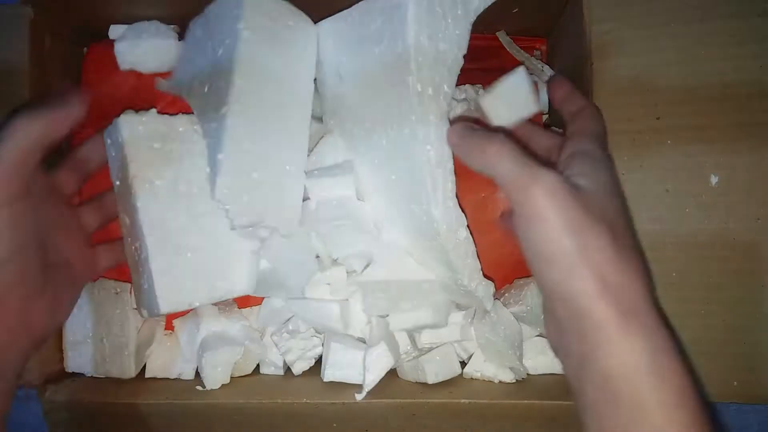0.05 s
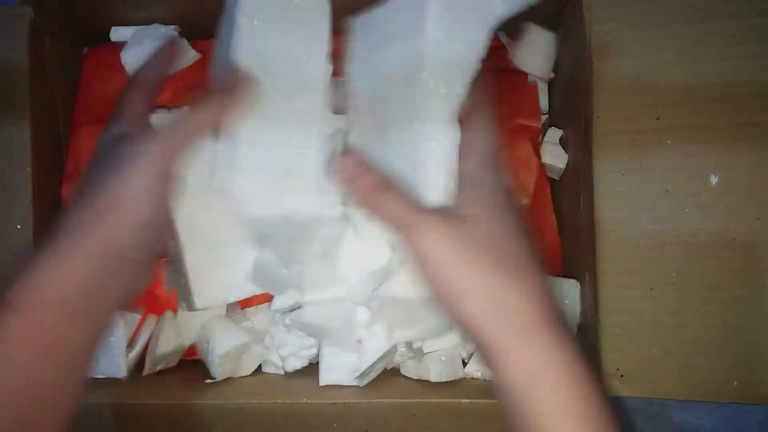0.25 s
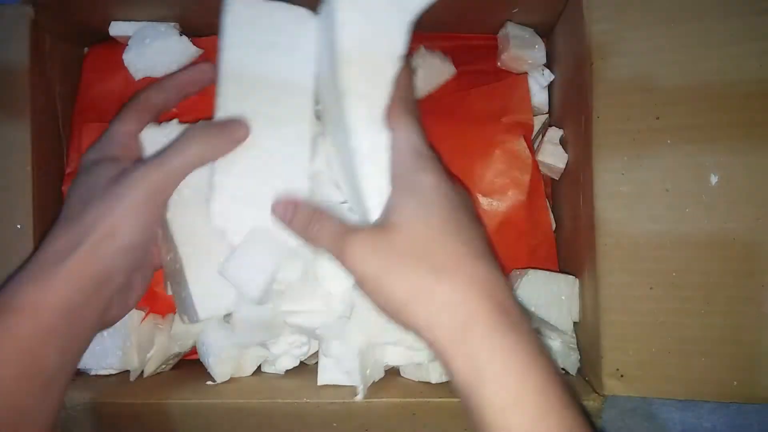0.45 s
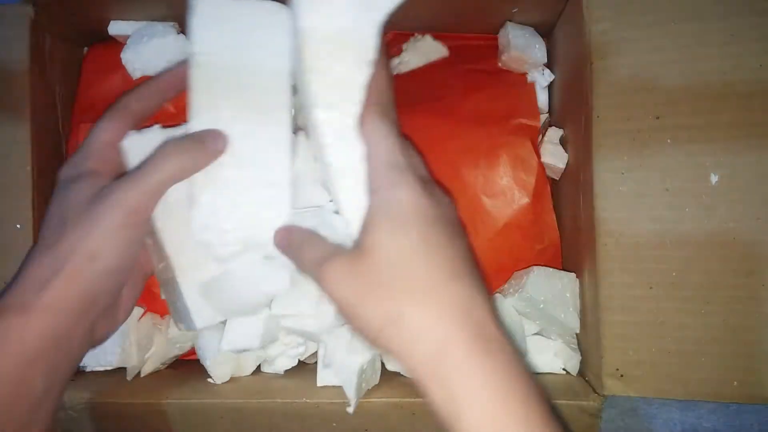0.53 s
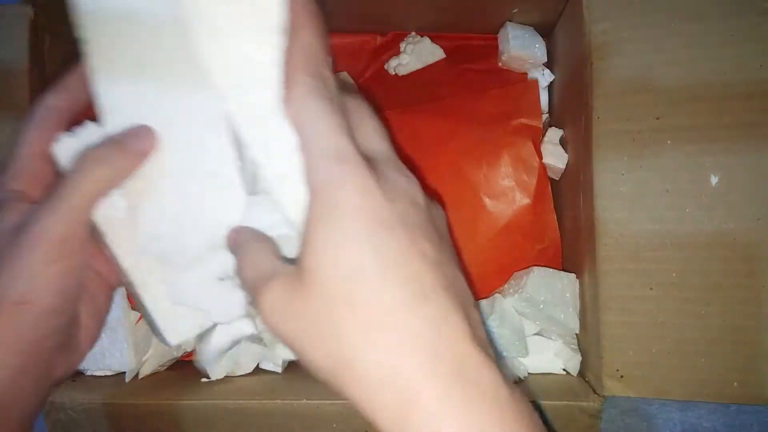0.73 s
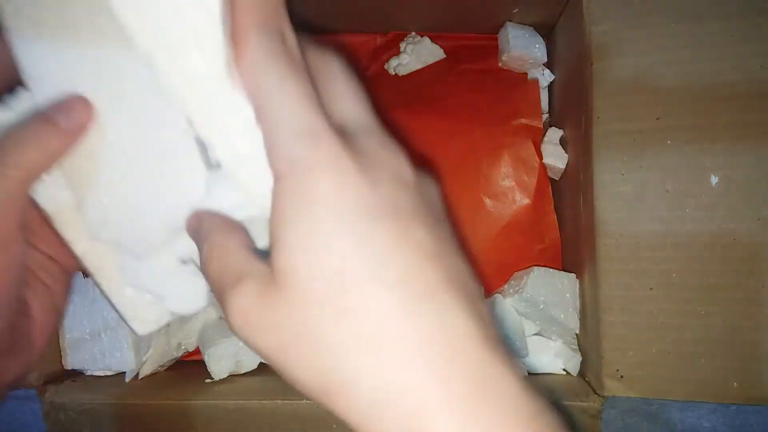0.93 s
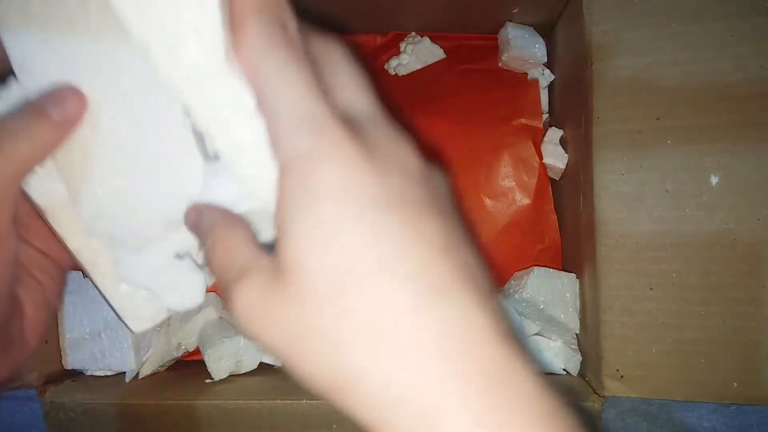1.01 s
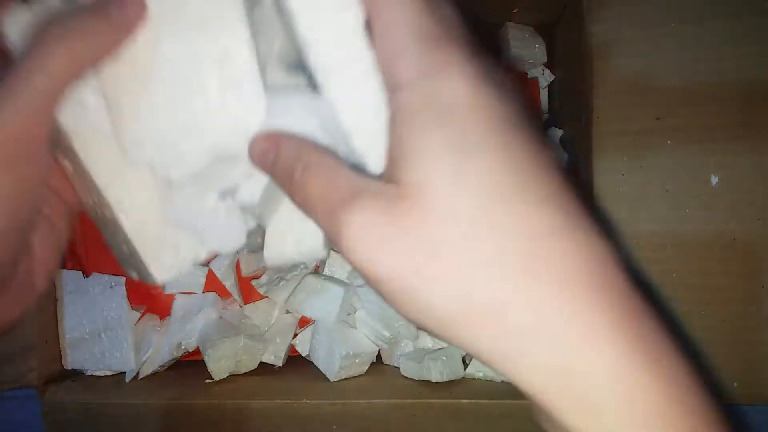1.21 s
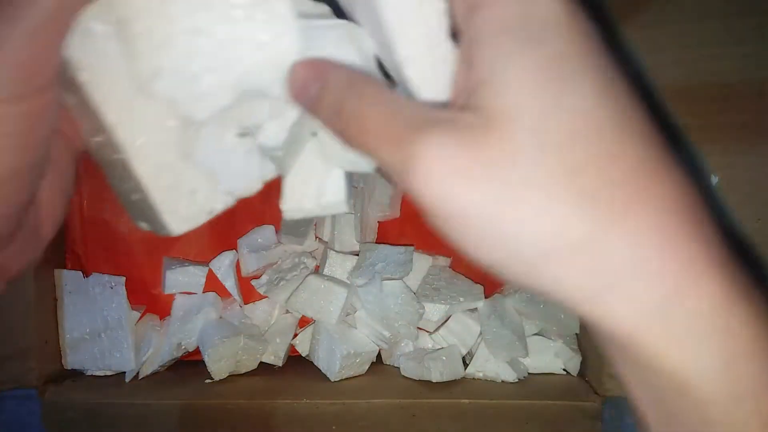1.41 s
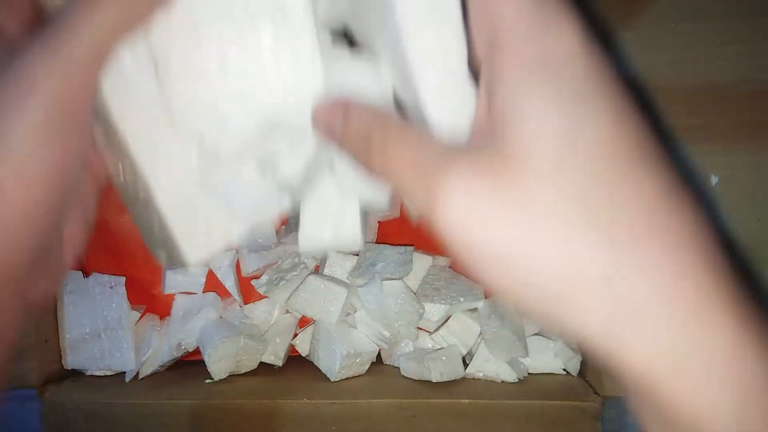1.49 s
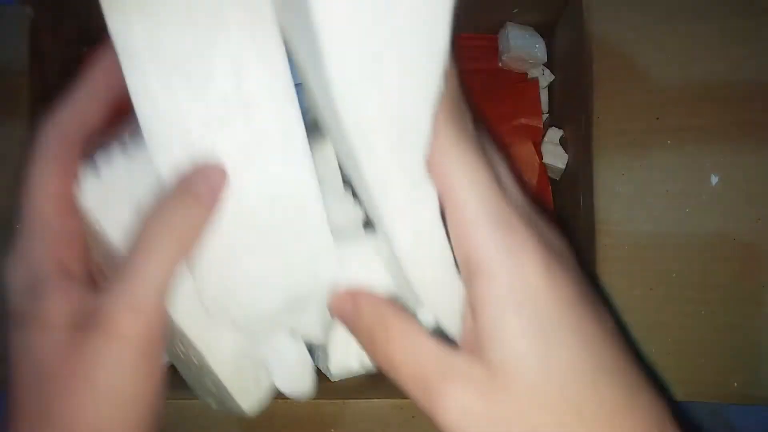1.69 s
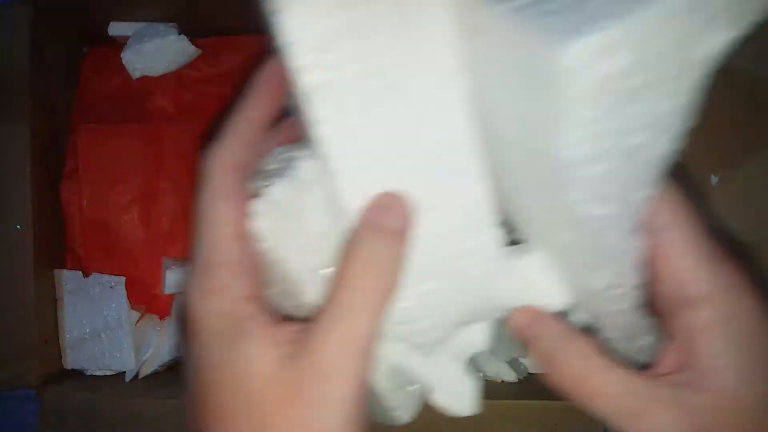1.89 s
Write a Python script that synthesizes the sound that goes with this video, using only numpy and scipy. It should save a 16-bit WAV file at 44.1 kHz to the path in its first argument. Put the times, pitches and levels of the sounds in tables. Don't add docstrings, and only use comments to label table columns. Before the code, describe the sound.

Foam packing blocks rustle lightly under the hands, with a soft low thump in the cardboard box at 0.2 s. A dense, bright crackling crunch builds from 0.42 to 0.69 s over a mid-pitched cardboard drag, then drops away. Sparse ticks and faint rubs follow, a corner crushes at 1.14 s, a face stutters near 1.4 s, chunks knock, and a rub and bump land at 1.8 s. Close, dry, quiet small room.

```python
import sys
import numpy as np
from scipy import signal
from scipy.fft import rfft, irfft, next_fast_len
from scipy.io import wavfile
from scipy.ndimage import uniform_filter1d, map_coordinates

SR = 44100
rng = np.random.default_rng(int(sys.argv[2]) if len(sys.argv) > 2 else 0)


def dump_mix(stems):
    frames = np.atleast_2d(stems).T
    limited = np.clip(frames, -1, 1)
    pcm = np.round(limited * 32767).astype(np.int16)
    wavfile.write(sys.argv[1], SR, pcm)


def field_ratio(decibels):
    return 10 ** (np.asarray(decibels, dtype=float) / 20)


N = 85995


def unit(x):
    return x / np.sqrt(np.mean(x ** 2) + 1e-20)


def along(points, hz):
    f, value = np.transpose(points)
    return np.interp(np.log(hz + 1), np.log(f + 1), value)


def curves(rows):
    s, *columns = np.transpose(rows)
    return [np.interp(np.arange(N) / SR, s, column) for column in columns]


def wobble(rate):
    return map_coordinates(rng.standard_normal(400), [np.arange(N) * min(rate, 200) / SR])


def filtered(x, response):
    m = next_fast_len(N + SR // 2)
    return irfft(rfft(x, m) * response(np.fft.rfftfreq(m, 1 / SR)), m)[..., :N]


def sides(pan_db):
    return field_ratio(np.array([pan_db / 2, -pan_db / 2]))


def add(x, s, sound):
    part = x[..., round(s * SR):][..., :sound.shape[-1]]
    part += sound[..., :part.shape[-1]]


def ring(modes, attack_s):
    t = np.arange(SR // 4) / SR
    tones = sum(field_ratio(db - 60 * t / t60) * np.sin(2 * np.pi * hz * t) for hz, db, t60 in modes)
    return tones * (1 - np.exp(-t / attack_s))


def burst(hz, wide, t60, attack_s):
    t = np.arange(SR // 20) / SR
    a, b = rng.standard_normal((2, len(t)))

    def response(f):
        peak = 1 / (1 + ((f - hz) / (wide * hz)) ** 2)
        hiss = field_ratio(along(FACE_COLOUR, f)) * f ** 4 / (f ** 4 + 4000.0 ** 4)
        return peak + .2 * hiss

    puff = filtered(np.array([a + .5 * b, a - .5 * b]), response)[:, :len(t)]
    return unit(puff) * field_ratio(-60 * t / t60) * (1 - np.exp(-t / attack_s))


def shifting(x, depth_db):
    z = signal.stft(x, nperseg=512)[2]
    common, *own = np.split(rng.standard_normal((3,) + z.shape[1:]), [1])
    field = common + 0.78 * own[0]
    field = uniform_filter1d(uniform_filter1d(field, size=3, axis=1), size=9, axis=2)
    return unit(signal.istft(z * field_ratio(depth_db * unit(field)), nperseg=512)[1][:, :N])


def slips(spectrum, centre_hz, octaves, cycles, size_db, spread_s, bed, count):
    u, g = rng.random((count, 3)), rng.standard_normal((count, 3))
    hz = np.clip(centre_hz * 2 ** (octaves * g[:, :1]), 300, 15500)
    t = np.arange(96) / SR
    size = np.minimum(-size_db * np.log(u[:, 1:2]), 15)
    shape = field_ratio(size - 8.7 * t * hz / cycles) * np.sin(2 * np.pi * hz * t)
    out = np.zeros((2, N))
    for c, sign in enumerate((1, -1)):
        start = np.abs(u[:, :1] * N + sign * spread_s * SR * g[:, 1:2]).astype(int)
        at = start + np.arange(len(t))
        panned = shape * field_ratio(2 * sign * g[:, 2:])
        out[c] = np.bincount(at.ravel(), panned.ravel(), N + SR)[:N]
    out = unit(out) + bed * (rng.standard_normal(N) + .8 * rng.standard_normal((2, N)))
    power = uniform_filter1d(np.sum(np.abs(rfft(out)) ** 2, 0), size=1500)
    even = lambda f: np.interp(f, np.fft.rfftfreq(N, 1 / SR), power) ** -.5
    return shifting(filtered(out, lambda f: even(f) * field_ratio(along(spectrum, f))), depth_db=3.3)


# (frequency [Hz], density [dB per Hz])
AIR_COLOUR = [(25, -48.5), (60, 1), (200, -18.5), (280, -10.5), (600, -21), (1600, -31), (4100, -29.5),
              (9000, -23), (15800, -40.5)]
# (frequency [Hz], level [dB])
HUM = [(62, -91), (272, -83)]


def hush():
    a, b = rng.standard_normal((2, N))
    side = filtered(b, lambda f: field_ratio(along([(60, -20.5), (400, -5.5), (2000, 1.5)], f)))
    air = unit(filtered(np.array([a + side, a - side]), lambda f: field_ratio(along(AIR_COLOUR, f))))
    t = np.arange(N) / SR
    hum = sum(field_ratio(db + 1.5 * wobble(8)) * np.sin(2 * np.pi * hz * t + .4 * wobble(6)) for hz, db in HUM)
    return field_ratio(-73) * air + hum


# (frequency [Hz], t60 [s])
ROOM_T60 = [(300, .3), (3000, .25), (12000, .15)]


def room(x):
    hz, t, z = signal.stft(rng.standard_normal((2, SR // 2)), SR, nperseg=256)
    tail = signal.istft(z * field_ratio(-60 * t / along(ROOM_T60, hz)[:, None]), SR, nperseg=256)[1]
    late = np.pad(x.mean(0), (200, 0))[None]
    return signal.fftconvolve(late, tail / np.linalg.norm(tail[0]), axes=1)[:, :N]


# (frequency [Hz], level [dB], t60 [s])
THUMP = [(74.7, -1.7, 0.043), (210, 2.1, 0.062), (352, 1, 0.037)]
# (frequency [Hz], level [dB], t60 [s])
BUMP = [(430, 0, .03), (790, -3, .025), (1290, -1, .022), (1800, -9, .018)]
# (time [s], level [dB], frequency [Hz])
JOLTS = [
    (.655, -63, 52),
    (1.822, -66, 62),
    (.545, -57, 440),
]


def box_blows():
    out = np.zeros((2, N))
    add(out, .199, field_ratio(-33) * ring(THUMP, .006))
    add(out, 1.8125, field_ratio(-40) * ring(BUMP, .002))
    for s, db, hz in JOLTS:
        add(out, s, ring([(hz, db, .09)], 0.0033))
    return out


# (frequency [Hz], density [dB per Hz])
BOX_COLOUR = [(150, -49), (300, -13.5), (660, -12), (1080, -17), (1250, -1), (1900, -6), (2600, -7),
              (3400, -29), (5700, -120)]
# (time [s], level [dB])
DRAG = [
    (0.0, -59),
    (0.18, -58),
    (0.202, -45.5),
    (0.344, -51.5),
    (0.364, -49),
    (0.596, -52.5),
    (0.692, -59.5),
    (0.754, -73),
    (0.8, -104),
]


def drag():
    db, = curves(DRAG + [(.95, -100)])
    raw = slips(BOX_COLOUR, 1395, 0.64, cycles=2.5, size_db=0, spread_s=.00004, bed=.3, count=2500)
    return raw * field_ratio(db + wobble(40))


# (frequency [Hz], density [dB per Hz])
FACE_COLOUR = [(290, -17), (500, -8.5), (1080, -13), (1300, -6), (2600, -11.5), (3520, -8), (8990, -1.5),
               (15800, -22)]
# (peak time [s], level [dB], rise [s], fall t60 [s], dull part [dB])
RUBS = [(.15, -45, .012, 0.28, -6), (.198, -39, .005, 0.11, -1), (0.799, -54.5, 0.097, 1, -6.5),
        (.865, -54.5, 0.021, 0.87, -31), (1.012, -52.5, 0.0087, 0.16, -9.5), (1.105, -56, 0.023, 0.1, -28),
        (1.15, -49.5, 0.011, .25, -3.5), (1.199, -55.5, 0.0076, .06, -0.5), (1.27, -65, .02, 0.21, -5.5),
        (1.382, -51, 0.028, 0.21, -12), (1.451, -75.5, 0.066, 0.22, 19), (1.509, -67, 0.037, 0.065, 7),
        (1.603, -64.5, .004, 0.62, -1.5), (1.633, -54.5, 0.011, 0.25, -3.5),
        (1.772, -43.5, 0.0038, 0.19, -5.5), (1.817, -33.5, 0.044, 0.049, -0.5),
        (1.839, -49.5, 0.04, 0.2, 1), (1.903, -51.5, 0.0057, 0.16, -8), (1.929, -59, .01, 0.054, -3)]


def rubs():
    t = np.arange(N) / SR
    power = []
    for s, db, rise, fall, _ in RUBS:
        swell_db = np.where(t < s, -25 * (s - t) / rise, -60 * (t - s) / fall)
        power.append(field_ratio(db + swell_db) ** 2)
    power = np.array(power)
    raw = slips(FACE_COLOUR, 6500, .55, cycles=3, size_db=3, spread_s=.00003, bed=.7, count=12000)
    raw = raw * field_ratio(.8 * wobble(90))
    dull = filtered(raw, lambda f: 1 / (1 + (f / 4700) ** 6))
    dull_power = field_ratio(np.array(RUBS)[:, -1]) ** 2 @ power
    return (raw - dull) * np.sqrt(power.sum(0)) + dull * np.sqrt(dull_power)


# (time [s], peak level [dB], frequency [Hz])
KNOCKS = [
    (1.013, -61.5, 1375),
    (1.131, -49, 714),
    (1.167, -56, 690),
    (1.22, -52, 3130),
    (1.462, -45, 1114),
    (1.497, -56.5, 1170),
    (1.514, -62, 1055),
    (1.632, -54, 1025),
    (1.757, -54, 1400),
    (1.772, -46, 1220),
]


def knocks():
    out = np.zeros((2, N))
    for s, db, hz in KNOCKS:
        puff = burst(hz, wide=.3, t60=.016, attack_s=.001)
        mode = ring([(hz, 7, .02)], .001)[:SR // 20]
        add(out, s, field_ratio(db - 6) * (puff + mode))
    return out


# (time [s], peak level [dB], frequency [Hz], left-right [dB])
TICKS = [(0.8565, -35.5, 6430, 1.5), (1.0842, -43, 7700, -4), (1.131, -51, 6000, -3),
         (1.1672, -41.5, 3180, 13), (1.254, -44.5, 7600, 2), (1.3099, -78.5, 8300, 5),
         (1.435, -60, 3000, 2), (1.4493, -55.5, 2500, -4), (1.4616, -46, 6400, 3), (1.496, -56.5, 7230, -2),
         (1.7374, -43.5, 8600, 0), (1.7569, -46.5, 6170, -10), (1.7724, -42, 7400, -8),
         (1.9305, -40.5, 6600, -12)]


def ticks():
    out = np.zeros((2, N))
    for s, db, hz, pan in TICKS:
        puff = burst(hz, wide=.3, t60=.012, attack_s=.0009)
        add(out, s, field_ratio(db) * puff * sides(pan)[:, None])
    return out


# (time [s], level [dB], frequency [Hz])
CRUSH = [
    (1.138, -38.5, 5330),
    (1.13, -38, 3700),
    (1.1405, -33, 6200),
    (1.144, -35.5, 4450),
]


def corner_crush():
    out = np.zeros((2, N))
    for s, db, hz in CRUSH:
        add(out, s, field_ratio(db) * burst(hz, wide=.25, t60=.023, attack_s=.0013))
    return out


# (time [s], peak level [dB], left-right [dB])
SNAPS = [(0.4423, -22, 0), (0.4441, -23, -2), (0.4596, -15, 6), (0.4688, -14, 3), (0.4755, -16, 9),
         (0.4797, -15, 2.5), (0.4894, -15, 4), (0.4991, -19.5, 2), (0.5052, -14, 2.5), (0.5121, -12, 4),
         (0.519, -13.5, -1), (0.533, -17, 5), (0.5369, -14, 4.5), (0.5405, -14.5, 4.5), (0.5555, -10.5, 5),
         (0.5635, -14.5, 4), (0.5743, -16.5, 10), (0.58, -13, 11), (0.5971, -12.5, 6.5), (0.601, -13.5, 5),
         (0.6162, -22.5, 0), (0.6207, -23, 4), (0.6298, -18, -1.5), (0.6363, -17, 2.5), (0.6453, -17, 7),
         (0.6494, -13.5, 8)]
# (time [s], peak level [dB], left-right [dB])
CRACKLE = [
    (1.3751, -42, 5),
    (1.3813, -41, 0),
    (1.385, -47, 2),
    (1.3907, -44, 3.5),
    (1.3955, -50, 1),
    (1.4076, -49, -1),
    (1.4217, -55, 5),
    (1.431, -58, -4),
    (1.4353, -57, 2),
]
# (time [s], peak level [dB], left-right [dB])
STRAYS = [(.002, -30, 1), (.1966, -25, -1), (.2003, -25, -1), (0.2305, -25, 7), (.2633, -32, 0),
          (0.296, -26.5, 1), (.4013, -22.5, -1), (1.0125, -45, 3), (1.0204, -44, 9), (1.027, -45, 4),
          (1.108, -49, 0), (1.1146, -49, 7), (1.2025, -48, 0), (1.8565, -43, -4), (1.9113, -42, -1)]
SNAP_HZ = (5370, 6600, 7940, 9800)


def snaps():
    out, t = np.zeros((2, N)), np.arange(SR // 100) / SR
    t60, rise_s = .007, .0003
    for s, db, pan in SNAPS + CRACKLE + STRAYS:
        g = rng.standard_normal((3, len(SNAP_HZ), 1))
        hz = np.array(SNAP_HZ)[:, None] * (1 + .08 * g[1])
        tones = field_ratio(2.4 * g[0]) * np.sin(2 * np.pi * hz * t + 2 * g[2])
        shape = field_ratio(db - 5 - 60 * t / t60) * (1 - np.exp(-t / rise_s)) ** 2
        add(out, s - .0005, shape * tones.sum(0) * sides(pan)[:, None])
    return filtered(out, lambda f: f ** 6 / (f ** 6 + 3500.0 ** 6) / (1 + (f / 12000) ** 8))


# (time [s], pressure [dB], left-right [dB])
PRESSURE = [
    (0.0, -39, -2.5),
    (0.032, -52, 6.5),
    (0.062, -43, 0.5),
    (0.084, -57, 2.5),
    (0.112, -51, 5),
    (0.22, -32, -2.5),
    (0.244, -38.5, 2),
    (0.282, -41.5, 4.5),
    (0.4, -35.5, 4),
            (0.423, -35, 4),
    (0.46, -26.5, 3),
    (0.599, -23, 8),
    (0.615, -34.5, 2),
    (0.631, -27.5, 1),
    (.646, -24.5, 9),
    (0.676, -23.5, 5),
    (0.69, -40, 2.5),
    (0.772, -55.5, 2.5),
]
# (frequency [Hz], density [dB per Hz])
FOAM_COLOUR = [(290, -83.5), (500, -44.5), (1240, -25), (2350, -16), (3180, -7.5), (4180, -6.5),
               (6180, -4.5), (8990, -6), (15800, -25)]
# (frequency [Hz], width [Hz], lift [ratio])
BLOCK_MODES = [(3060, 370, 0.8), (4430, 200, -0.62), (6000, 960, 0.3), (7600, 1200, 0.63)]
# (frequency [Hz], left-right [dB])
SKEW = [(300, 3.5), (700, 0.5), (2800, -4), (5500, -5), (9500, 7.5), (14000, 2.5)]
# (frequency [Hz], density [dB per Hz])
SHAKE_COLOUR = [(30, -45.5), (60, -17.5), (140, -9.5), (400, -11.5), (900, -34.5), (2000, -120)]


def scrape():
    db, pan = curves(PRESSURE + [(.9, -100, 0.0013)])
    raw = slips(FOAM_COLOUR, 6800, .45, cycles=2.6, size_db=3, spread_s=.00003, bed=1.1, count=12000)

    def body(f):
        modes = sum(lift / (1 + ((f - hz) / width) ** 2) / 2 for hz, width, lift in BLOCK_MODES)
        return (1 + modes) * sides(along(SKEW, f))

    shake = unit(filtered(rng.standard_normal(N), lambda f: field_ratio(along(SHAKE_COLOUR, f))))
    judder_db = .6 * wobble(110)
    shake_db = -77.5 + 0.28 * (db + 37) + 3 * wobble(30)
    crunch = unit(filtered(raw, body)) * field_ratio(db + judder_db) * sides(pan - 2.5)
    return crunch + field_ratio(shake_db) * shake


# (from [s], to [s], frequency [Hz], width [Hz], lift [dB])
HELD = [(0.067, 0.066, 6950, 620, 2), (.455, 0.486, 5200, 270, 7.5), (.505, .605, 6100, 450, 5),
        (.505, .605, 3300, 360, 3), (0.54, .69, 4250, 300, -6.5), (.635, 0.635, 3100, 350, 3.5),
        (.655, 0.688, 5200, 600, 6), (.25, .31, 720, 110, 9.5), (.34, 0.3, 640, 68, 5),
        (.2, .26, 1750, 200, 4)]


def held(x):
    hz, t, z = signal.stft(x, SR, nperseg=512)
    edge_s = .004
    lift_db = 0
    for start, end, centre, width, db in HELD:
        peak = db * np.exp(-((hz[:, None] - centre) / width) ** 2)
        lift_db = lift_db + peak / (1 + np.exp((start - t) / edge_s)) / (1 + np.exp((t - end) / edge_s))
    return signal.istft(z * field_ratio(lift_db), SR, nperseg=512)[1][:, :N]


def scene():
    small = box_blows() + knocks() + ticks() + corner_crush()
    foam = held(scrape() + drag()) + rubs() + small + snaps()
    return foam + field_ratio(-17) * room(foam) + hush()


def low_pass(x):
    return signal.sosfilt(signal.butter(12, 15850, fs=SR, output="sos"), x)


# (frequency [Hz], side gain [dB])
PORT_WIDTH = [(50, 4.5), (150, -4.5), (500, -4.5), (1500, 3), (6000, 2)]


def record(dry):
    mid = dry.mean(0)
    side = filtered((dry[0] - dry[1]) / 2, lambda f: field_ratio(along(PORT_WIDTH, f)))
    band = lambda f: (f < 15750) * f ** 3 / (f ** 3 + 38.0 ** 3)
    mix = filtered(np.array([mid + side, mid - side]), band)
    return low_pass(mix)


dry = scene()
out = record(dry)
dump_mix(out)
```